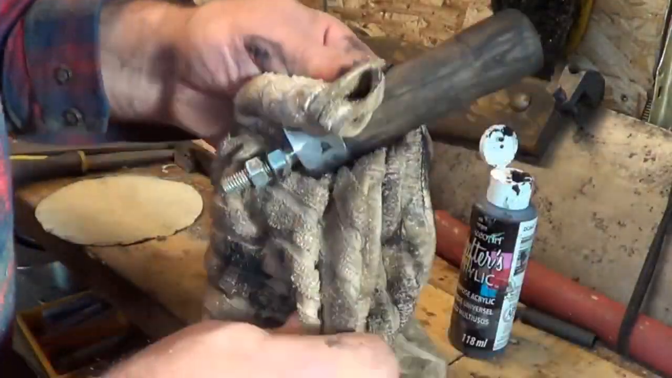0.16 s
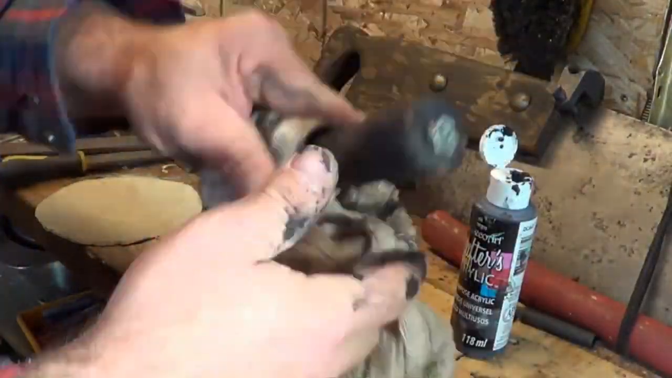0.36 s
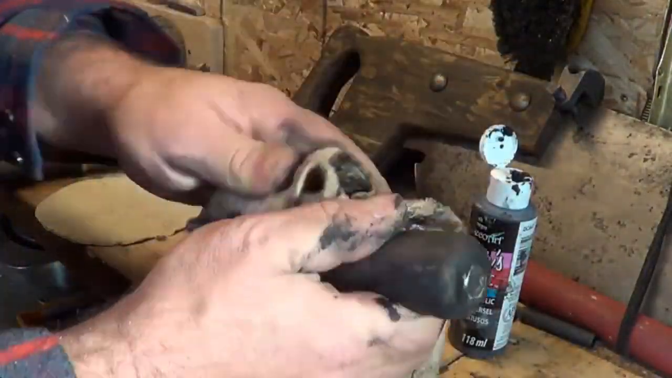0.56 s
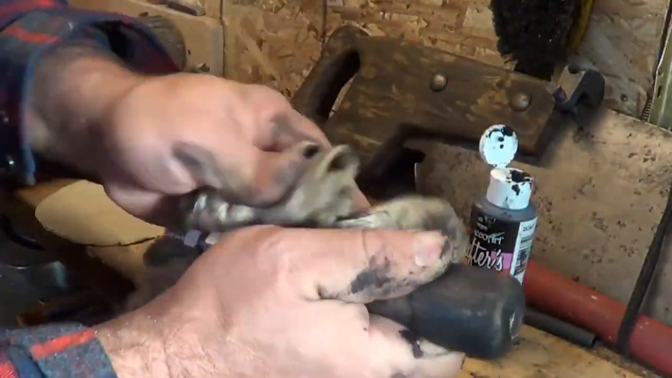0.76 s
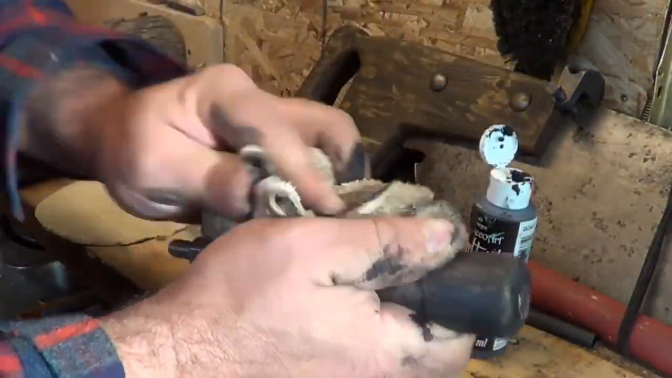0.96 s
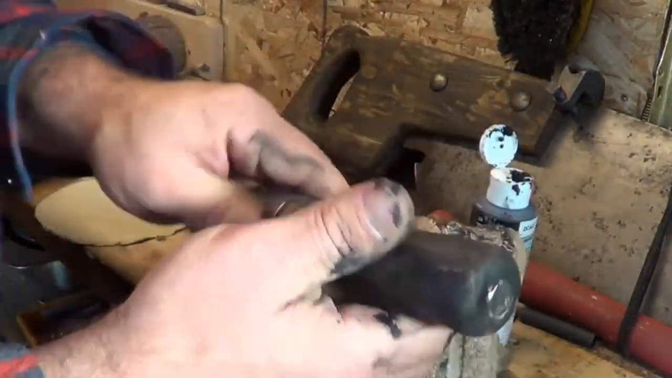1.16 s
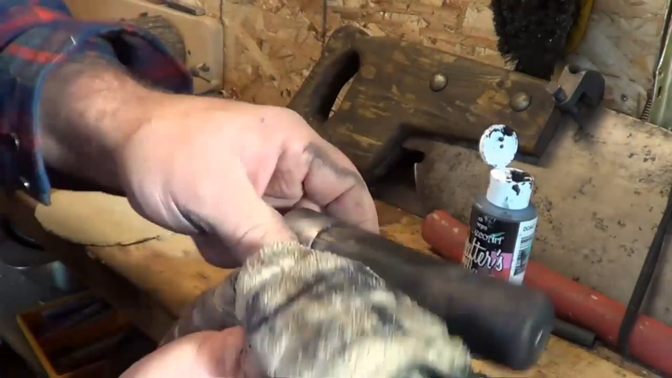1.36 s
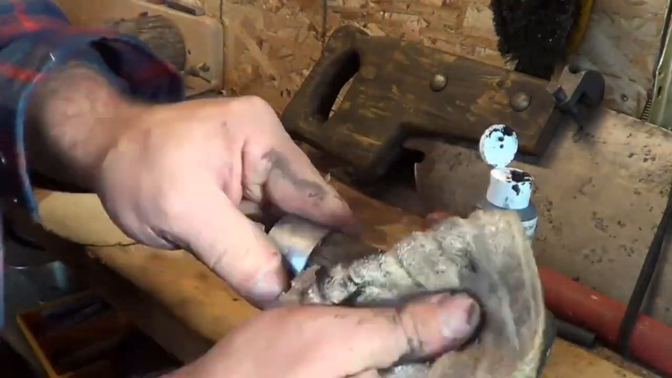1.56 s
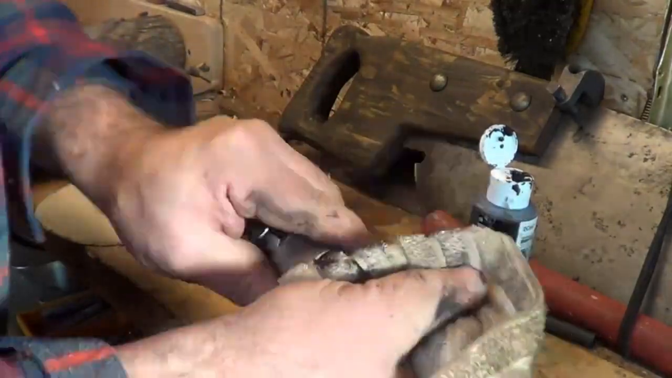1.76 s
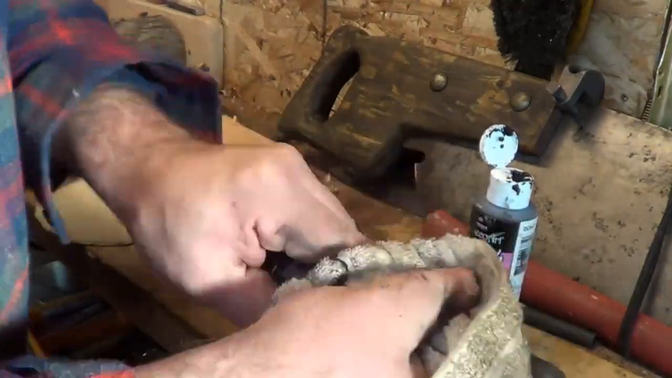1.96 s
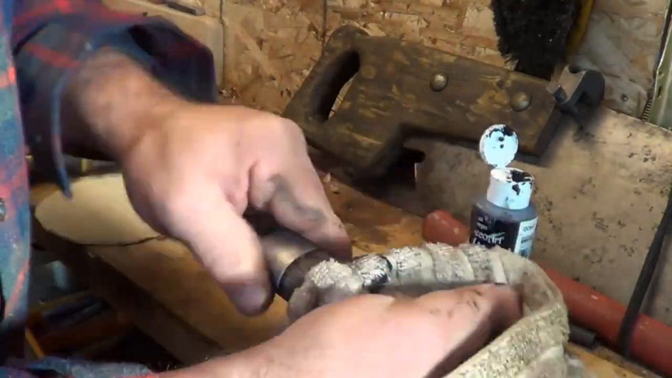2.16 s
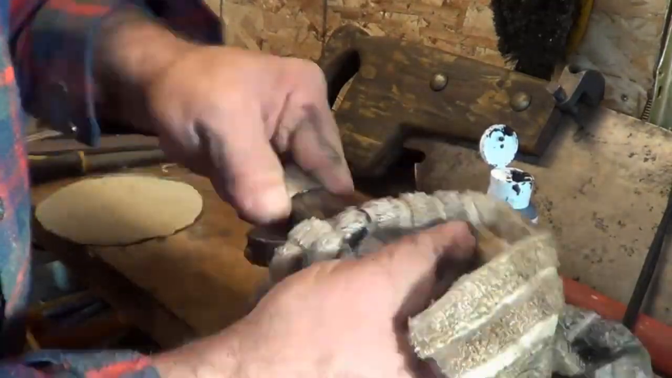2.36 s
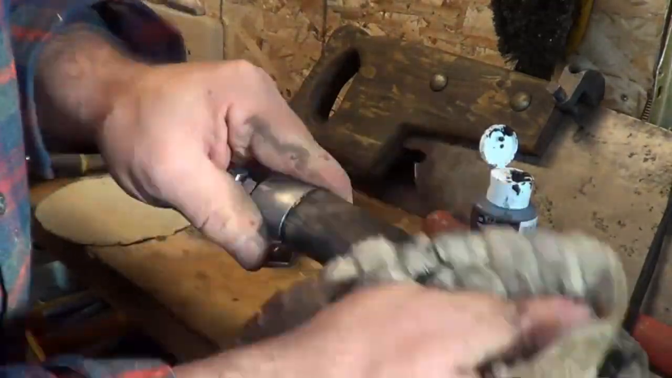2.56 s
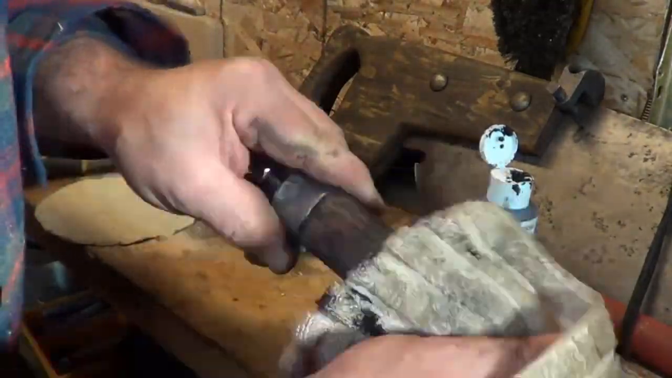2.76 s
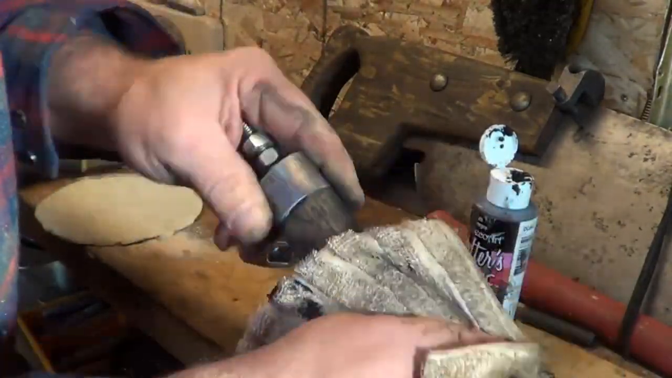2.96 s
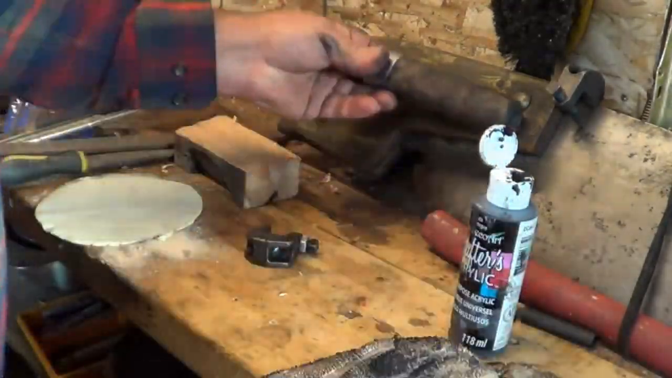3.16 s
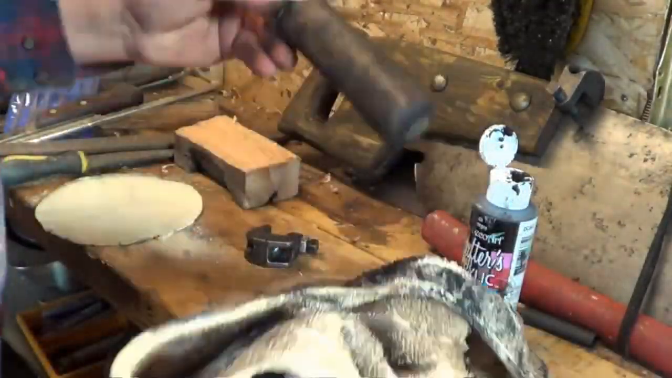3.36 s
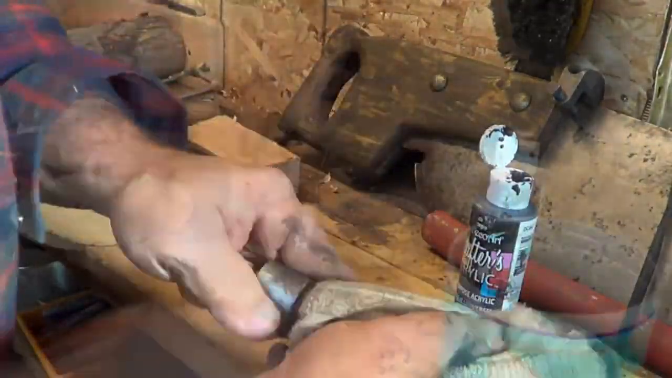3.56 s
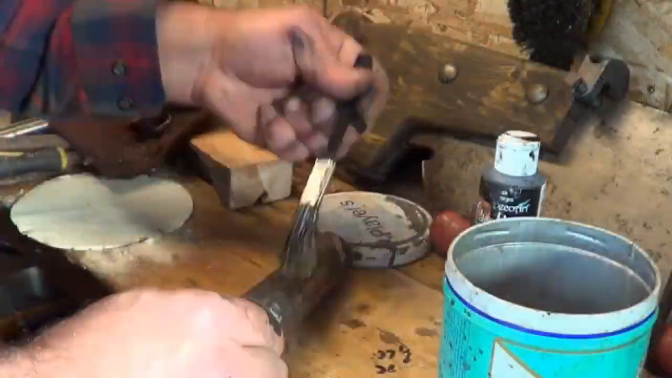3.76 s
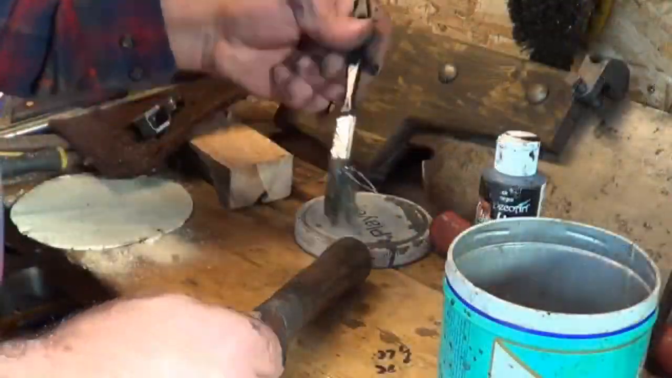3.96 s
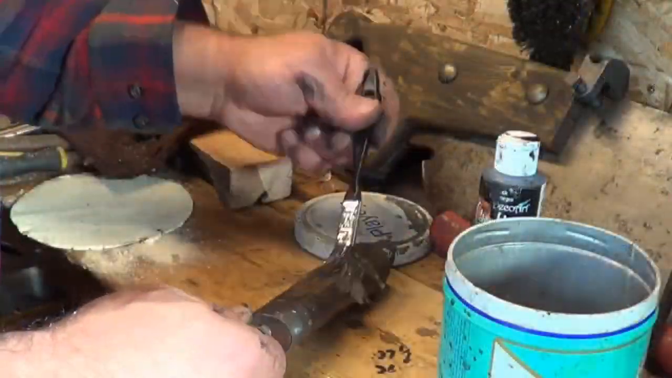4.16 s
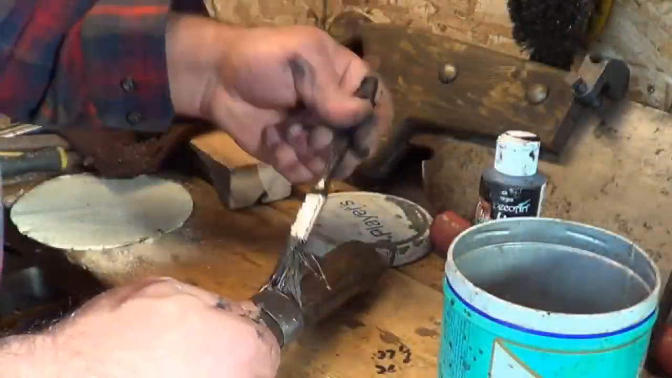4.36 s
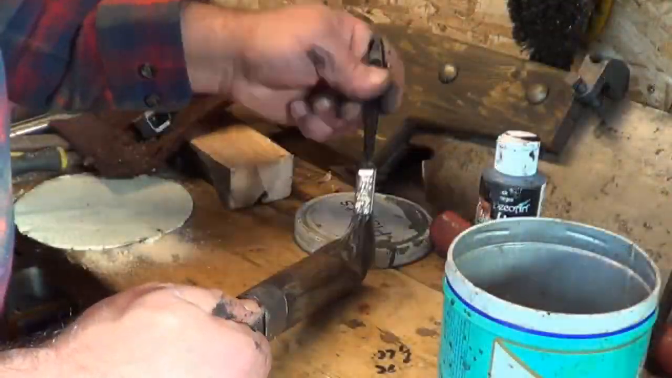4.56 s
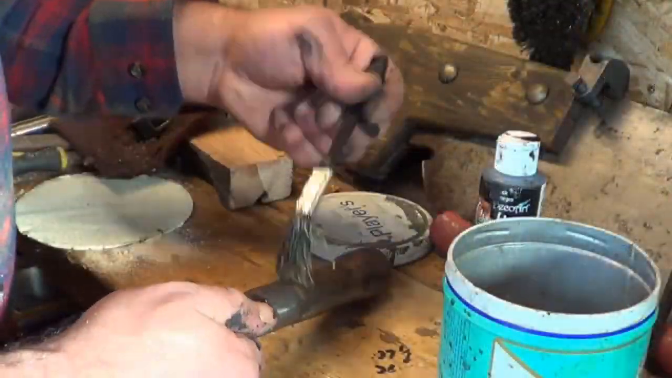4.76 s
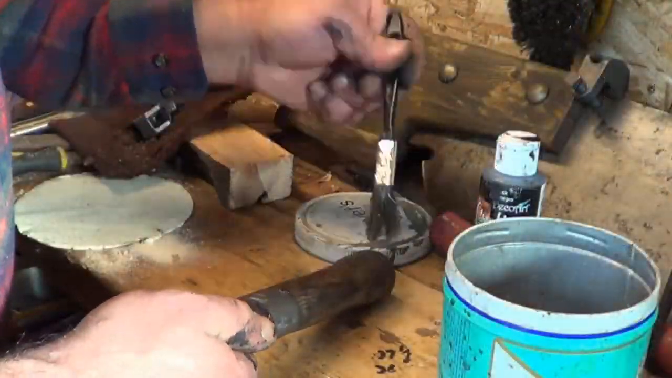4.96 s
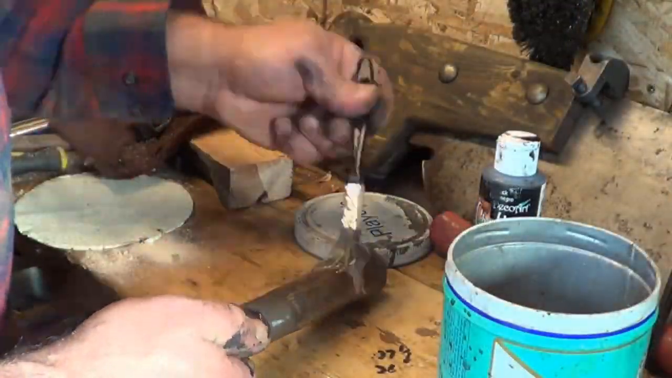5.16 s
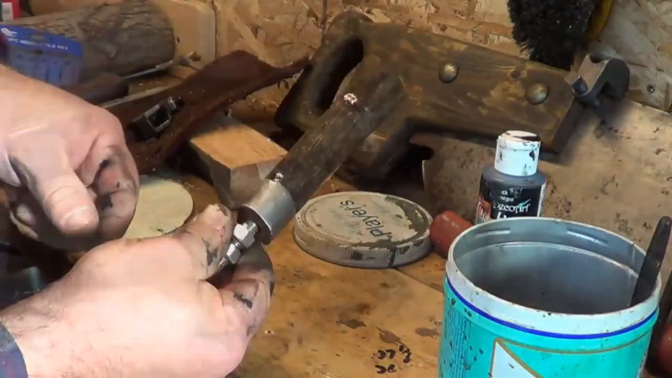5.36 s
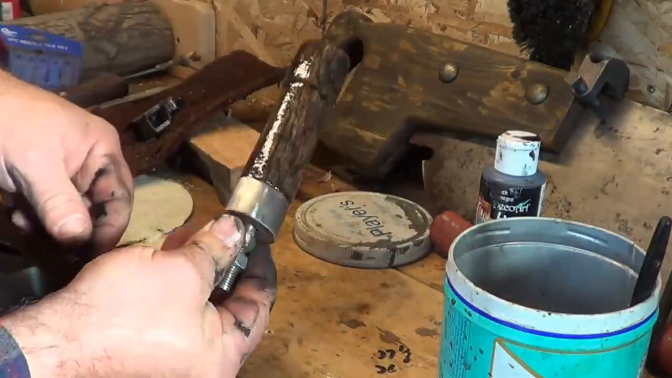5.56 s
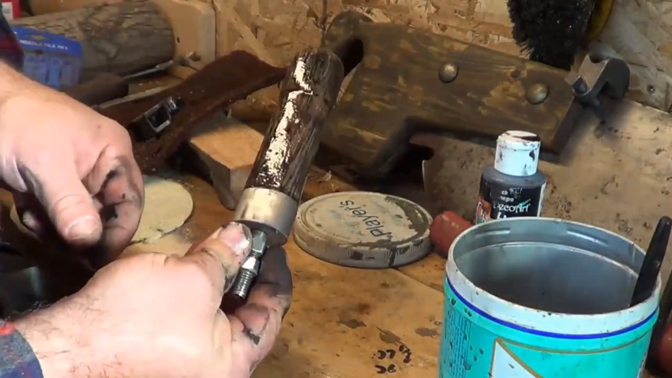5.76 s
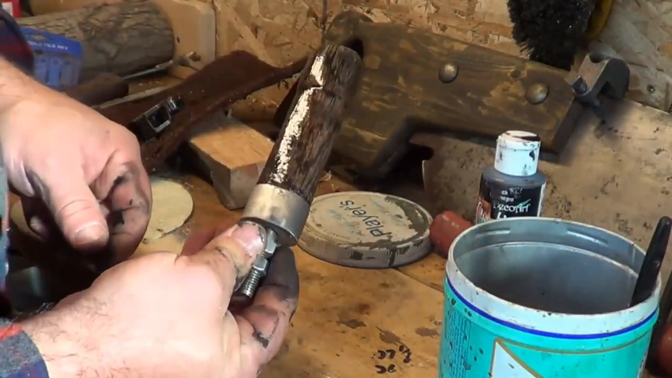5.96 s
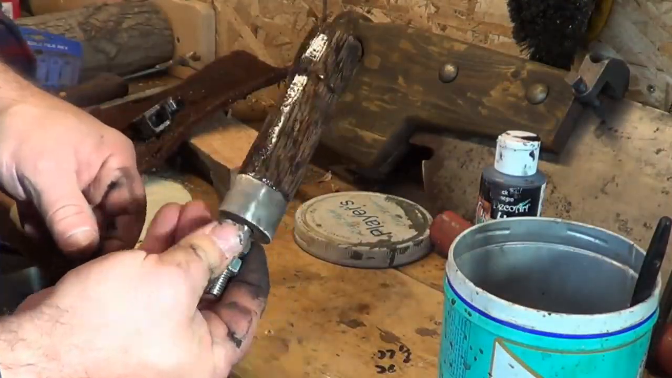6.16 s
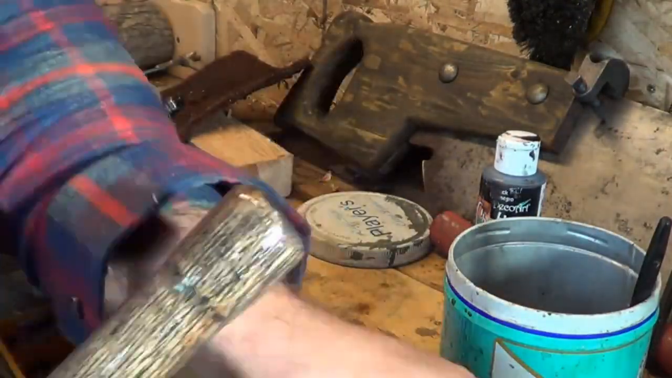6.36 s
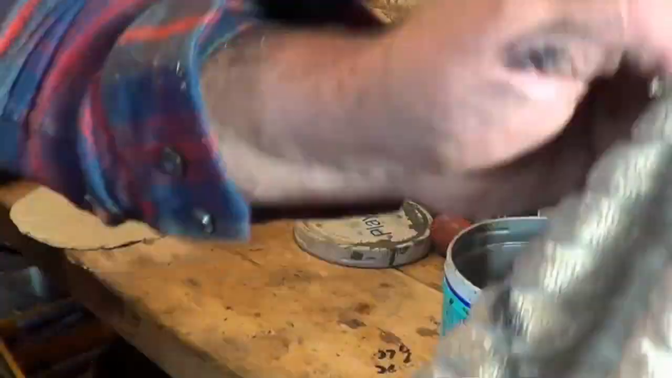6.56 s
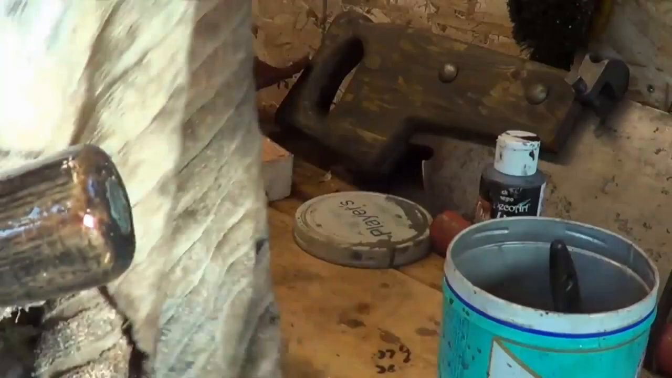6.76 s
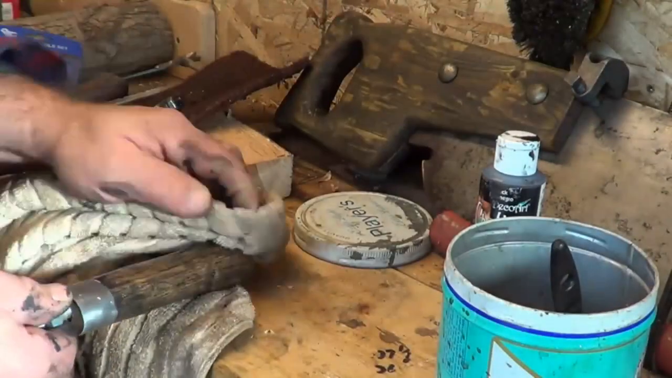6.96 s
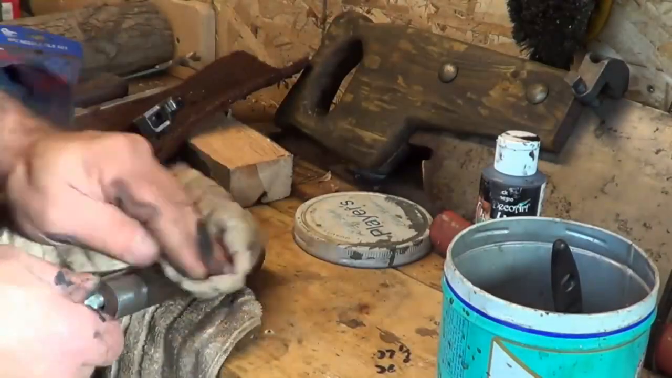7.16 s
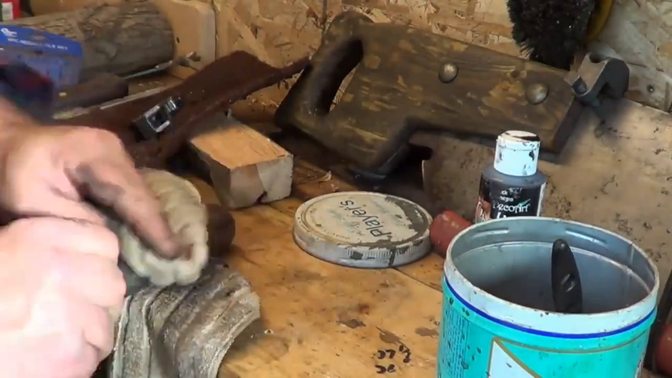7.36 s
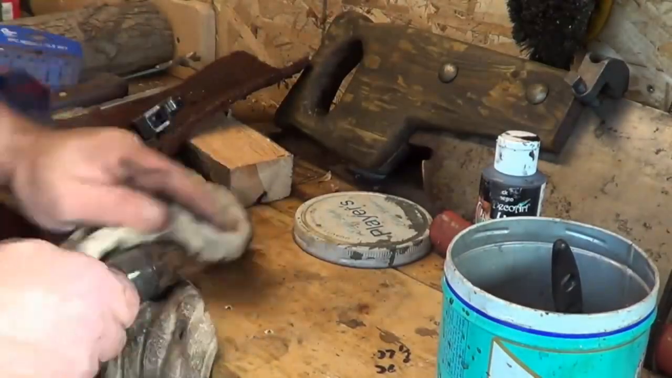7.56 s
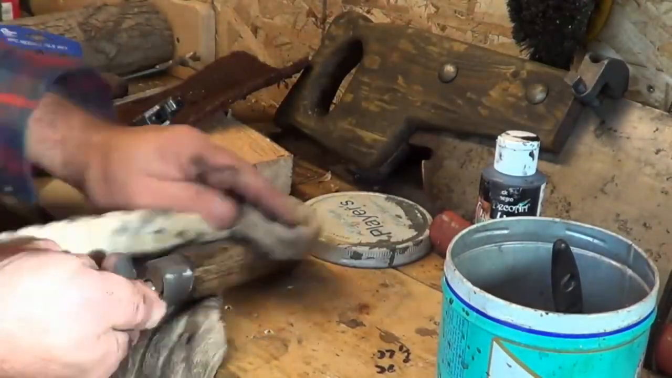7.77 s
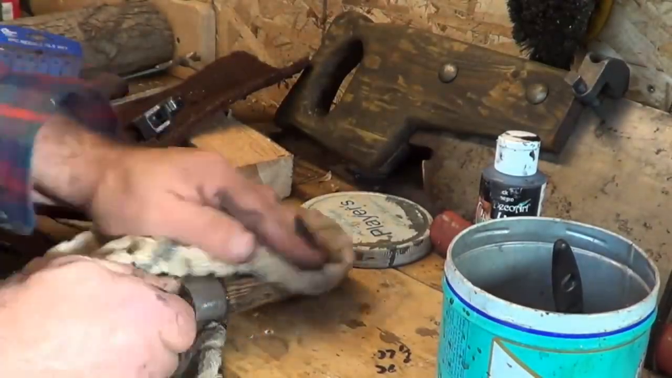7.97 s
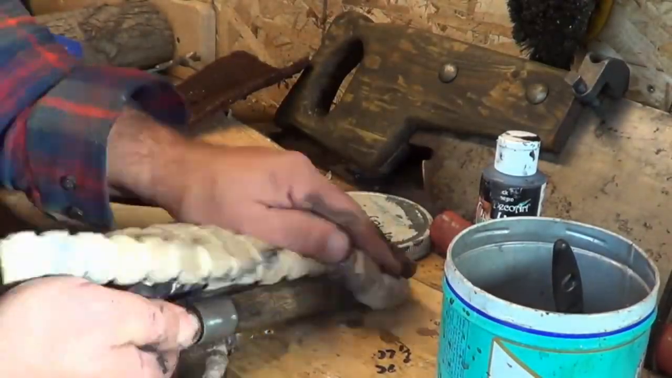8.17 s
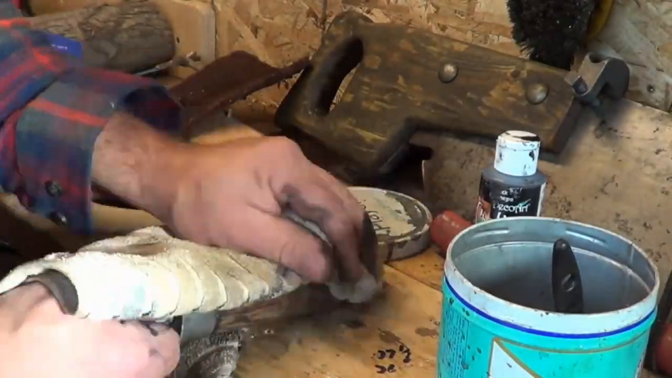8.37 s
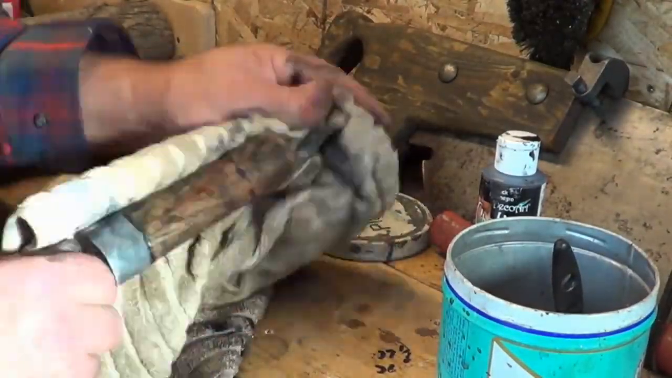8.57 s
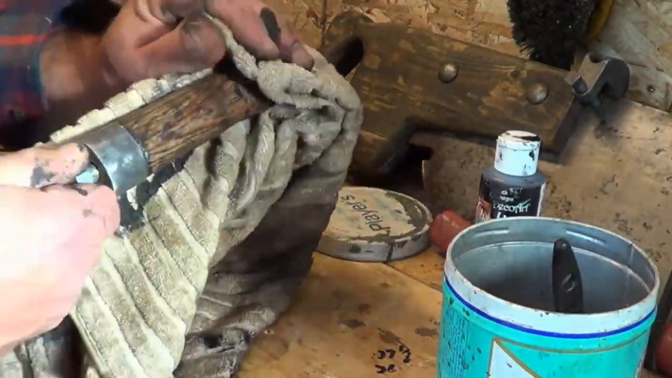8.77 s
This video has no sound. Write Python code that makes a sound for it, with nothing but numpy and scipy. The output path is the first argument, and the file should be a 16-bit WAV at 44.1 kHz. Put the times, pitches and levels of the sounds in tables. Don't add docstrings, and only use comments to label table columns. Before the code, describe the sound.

In a small hard workshop, a dry rag hisses over a wooden handle in fast, separate strokes. The handle cracks down on the bench, then a stiff brush scratches softly. After a quiet gap a metal ferrule clinks brightly, and brisk polishing follows with wooden knocks, sliding and a hard bang. Faint bird chips and whistles sit behind steady hiss, picked up by a close small camera microphone.

```python
import sys
import numpy as np
from scipy import signal
from scipy.fft import rfft, irfft
from scipy.io import wavfile
from scipy.ndimage import uniform_filter1d

SR = 44100
rng = np.random.default_rng(int(sys.argv[2]) if len(sys.argv) > 2 else 0)


def ratio_of_db(decibels):
    return 10 ** (np.asarray(decibels, float) / 20)


def unload_audio(sound):
    columns = np.transpose(np.atleast_2d(sound))
    steps = np.round(np.clip(columns, -1, 1) * 32767)
    wavfile.write(sys.argv[1], SR, steps.astype(np.int16))


N = 392490


def colour(x, points, lo_hz=1.5):
    hz, db = np.transpose(points)
    f = np.maximum(np.fft.rfftfreq(x.shape[-1], 1 / SR), lo_hz)
    gain = ratio_of_db(np.interp(np.log(f), np.log(hz), db))
    return irfft(rfft(x) * gain, x.shape[-1])


def band(x, lo_hz, hi_hz):
    sos = signal.butter(2, [lo_hz, min(hi_hz, SR / 2.1)], "band", fs=SR, output="sos")
    return signal.sosfilt(sos, x)


def unit(x):
    return x / np.sqrt(np.mean(x ** 2))


def curve(rows, column=1):
    table = np.array(rows)
    return np.interp(np.arange(N) / SR, table[:, 0], table[:, column])


def walk(rate_hz):
    hold = int(SR / rate_hz)
    steps = np.repeat(rng.standard_normal(N // hold + 1), hold)
    return uniform_filter1d(uniform_filter1d(steps, hold), hold)[:N]


def gate(start, end, fade):
    t = np.arange(N) / SR
    return np.clip(np.minimum(t - start + fade, end - t + fade) / fade, 0, 1)


def add(out, s, sound, pan_db):
    i = int(s * SR)
    piece = sound[:N - i]
    out[:, i:i + len(piece)] += piece * ratio_of_db(np.array([[pan_db], [-pan_db]]) / 2)


def spread(mid, side, alike):
    return mid + np.sqrt((1 - alike) / (1 + alike)) * side * np.array([[1], [-1]])


def level_out(x, size, fade):
    tone = rfft(x, size)
    even = irfft(tone / np.abs(tone) ** .92)[:len(x)] * fade
    return even * np.std(x) / np.std(even)


def causal(points, size):
    cepstrum = irfft(np.log(np.abs(rfft(colour(np.eye(1, size)[0], points)))), size)
    cepstrum[1:size // 2] *= 2
    cepstrum[size // 2 + 1:] = 0
    response = irfft(np.exp(rfft(cepstrum)), size)
    return response / np.abs(response).max()


def fibres(rate, scatter_db):
    snaps = (rng.random(N) < rate / SR) * ratio_of_db(scatter_db * rng.exponential(size=N))
    return unit(snaps * rng.standard_normal(N))


BUFFING = [.656, .711, .756, .81, .851, .888, .933, .978]
# middle in seconds, length in seconds, level in dB.
LONG_PULLS = [(1.676, 0.067, -52), (1.769, 0.036, -43), (1.854, 0.051, -46.5), (1.947, 0.058, -47),
              (2.055, 0.058, -46.5), (2.137, 0.046, -43.5), (2.228, 0.036, -47), (2.313, 0.045, -47),
              (2.426, 0.073, -50.5), (2.572, 0.067, -51.5), (2.766, 0.075, -56), (2.976, 0.11, -57)]
# middle in seconds, length in seconds, level in dB.
POLISHING = [(7.087, 0.021, -55), (7.11, .02, -59), (7.147, 0.028, -53), (7.2, 0.029, -54),
             (7.255, 0.016, -52), (7.291, 0.022, -52), (7.346, .03, -51), (7.385, 0.023, -54),
             (7.433, 0.028, -50), (7.473, 0.028, -50), (7.54, 0.025, -49), (7.572, .025, -51),
             (7.612, 0.026, -53), (7.665, 0.023, -55), (7.712, .03, -53), (7.758, 0.024, -52),
             (7.809, 0.027, -51), (7.854, .028, -50), (7.905, .028, -50), (8.028, .025, -49.5),
             (8.075, .035, -51), (8.132, .035, -53), (8.178, 0.048, -51), (8.265, 0.022, -53)]
# middle in seconds, length in seconds, level in dB.
RAG_SHIFTS = [(0.012, .025, -56), (.258, .057, -56), (0.404, .019, -54), (0.556, 0.2, -51.5),
              (1.016, 0.035, -45.5), (1.392, 0.071, -62), (1.518, 0.021, -49.5), (1.565, 0.062, -56),
              (1.613, 0.024, -54), (2.509, 0.05, -49), (2.632, 0.021, -48), (2.664, 0.018, -57),
              (2.83, .012, -51), (3.042, 0.048, -58), (3.446, 0.035, -60), (3.498, 0.038, -56),
              (3.545, .05, -58), (3.6, .018, -60), (3.633, .02, -56), (3.699, 0.012, -53),
              (7.94, 0.0094, -63), (8.1, 0.23, -57), (8.222, 0.03, -54), (8.298, 0.028, -58),
              (8.394, 0.094, -61), (8.5, 0.062, -52), (8.675, 0.025, -62), (8.734, 0.03, -59),
              (8.874, 0.078, -56)]


def strokes():
    moves = []
    levels, dullness = np.linspace(-55, -42, len(BUFFING)), np.linspace(3.5, -8, len(BUFFING))
    for s, db, dull_db in zip(BUFFING, levels, dullness):
        length = 0.0076 * max(1 + 0.23 * (-38 - db), .3)
        moves.append((s, length, db, dull_db))
    for rows, dull_db in ((LONG_PULLS, -3), (POLISHING, -8), (RAG_SHIFTS, -10)):
        moves += [(s, length, db, dull_db) for s, length, db in rows]
    return moves


# time in seconds, level in dB.
CLOTH_DRAG = [(0.0, -57), (0.45, -62.5), (0.84, -77), (1.25, -55), (1.4, -54), (1.71, -59), (2.53, -62),
              (3.15, -65.5), (5.01, -61.5), (5.3, -71), (7.06, -56), (7.8, -52.5), (7.93, -55.5),
              (8.0, -65.5), (8.3, -57), (8.9, -62)]
# pitch in Hz, level in dB per Hz.
CLOTH_COLOUR = [(1200, -30), (2500, -10), (4500, -2.5), (6500, -3), (8000, -1.5), (10200, -5), (13000, 0),
                (15700, -2.5)]


def rag():
    grain = colour(spread(fibres(12000, 0.53), fibres(12000, 2.7), 0.77), CLOTH_COLOUR)
    highpass = signal.butter(1, 8500, "high", fs=SR, output="sos")
    bright = signal.sosfiltfilt(highpass, grain)
    rasp = grain - bright
    scale = np.std(band(grain, 9500, 15500))
    drag = ratio_of_db(curve(CLOTH_DRAG) - 8.5 + 3.9 * walk(18)) * np.ones((2, 1))
    top, low = drag.copy(), drag * ratio_of_db(5.5)
    for s, length, db, dull_db in strokes():
        speed = np.hanning(int(1.4 * length * SR) + 2) ** 0.48
        add(top, max(s - 0.75 * length, 0), speed * ratio_of_db(db - 4.5), 0)
        add(low, max(s - 0.71 * length, 0), speed * ratio_of_db(db + dull_db + 2), 0)
    return (top * bright + low * rasp) / scale


# time in seconds, level in dB.
BRUSH_LEVEL = [(3.72, -78), (3.864, -56), (4.864, -59.5), (4.89, -83), (5.0, -56.5), (5.294, -65),
               (5.3, -79)]
# pitch in Hz, width in Hz, level in dB.
BRUSH_HISS_BANDS = [
    (2660, 610, 0.27),
    (3500, 630, -0.18),
]


def brush():
    slips = spread(fibres(8000, 1.0), fibres(8000, 1.2), 0.78)
    hiss = 0
    for hz, width, db in BRUSH_HISS_BANDS:
        hiss = hiss + ratio_of_db(db) * unit(band(slips, hz - width / 2, hz + width / 2))
    level = ratio_of_db(curve(BRUSH_LEVEL) - 4.5 + 0.37 * walk(23))
    return gate(BRUSH_LEVEL[0][0], BRUSH_LEVEL[-1][0], .05) * level * hiss


# time in seconds, level in dB.
SLIDE_LEVEL = [(6.75, -72), (7.22, -59), (7.53, -55), (7.74, -50), (7.93, -58.5), (8.15, -52.5),
               (8.33, -65), (8.46, -57), (8.9, -63)]


def scuff():
    wood = unit(band(spread(fibres(3500, 1.5), fibres(3500, 1.5), .75), 900, 3800))
    level = ratio_of_db(curve(SLIDE_LEVEL) - 3 + 3.4 * walk(25))
    return gate(SLIDE_LEVEL[0][0], SLIDE_LEVEL[-1][0], 0.089) * level * wood


def blow(hit, modes, crack, crack_ms, crack_db, click_db, ring_db, t60_share, rise_cycles):
    out, t = np.zeros((2, 2, N)), np.arange(8192) / SR
    s, peak_db, pan_db = hit
    hz, mode_db, t60 = np.transpose(modes)[:, :, None]
    rise = 1 - np.exp(-t * hz / rise_cycles)
    decay = ratio_of_db(mode_db - 60 * t / (t60 * t60_share))
    phase = rng.random(hz.shape) * rise_cycles
    ring = np.sum(rise * decay * np.sin(2 * np.pi * hz * t + phase), axis=0)
    damping = ratio_of_db(-60 * np.maximum(t - 0.016, 0) / .07)
    ring = band(ring / np.abs(ring).max(), 450, SR / 2) * damping
    contact = ratio_of_db(crack_db) * rng.standard_normal(len(t)) * np.exp(-t * 1000 / crack_ms)
    contact[0] += ratio_of_db(click_db)
    contact = level_out(contact, 2 * len(t), np.exp(-t * 1000 / (4 * crack_ms)))
    rattle = signal.fftconvolve(contact, causal(crack, size=len(t)))[:len(t)]
    add(out[0], s, ratio_of_db(peak_db - 6 + ring_db) * ring, pan_db)
    add(out[1], s, ratio_of_db(peak_db - 7) * rattle, pan_db)
    return out


# start in seconds, peak in dB, left minus right in dB.
SET_DOWN_HIT = (3.192, -12, -1.6)
# pitch in Hz, level in dB, time to fall 60 dB in seconds.
SET_DOWN_RING = [(650, -19, .09), (1400, -15, .05), (2794, 2, .08), (3730, -14, .05), (4070, -7, .055),
                 (4350, -7, .055)]
# pitch in Hz, level in dB per Hz.
SET_DOWN_COLOUR = [(170, -47), (300, -70), (640, -8.5), (1050, -17.5), (1450, -7), (2200, -15.5),
                   (2900, -0.5), (3600, -9), (4300, -6), (6000, -31), (15700, -41)]


def set_down():
    return blow(SET_DOWN_HIT, SET_DOWN_RING, SET_DOWN_COLOUR, 2.4, -12, -1.5, -3.5, 0.99, .4)


# start in seconds, peak in dB, left minus right in dB.
CLINK_HIT = (6.718, -8, -2)
JINGLE_HIT = (8.219, -36, 0)
# pitch in Hz, level in dB, time to fall 60 dB in seconds.
FERRULE_RING = [(1841, -14, .07), (2440, -6, .065), (2578, -2, .08), (3621, -3, .075), (7100, -12, .03),
                (10320, -10, .05), (12468, 2, .045), (12555, 1, .045), (12690, -2, .04), (15025, -3, .045),
                (15132, 1, .05)]
NUT_RING = [(4050, -1, .07), (5550, -5, .06), (6300, -6, .06), (7880, 1, .07), (10100, -9, .05)]
# pitch in Hz, level in dB per Hz.
METAL_COLOUR = [(120, -120), (500, -60), (800, -22), (1200, -13.5), (1850, -16), (2000, -8), (2530, -4.5),
                (4070, -12.5), (15700, -17)]


def metal():
    clink = blow(CLINK_HIT, FERRULE_RING, METAL_COLOUR, 1.5, -12.5, 6.3, -0.7, 1.0, .4)
    jingle = blow(JINGLE_HIT, NUT_RING, METAL_COLOUR, 2.0, -30, -20, 2.4, 1.1, 15.5)
    return clink + jingle


# start in seconds, peak in dB, left minus right in dB.
BANG_HIT = (8.4054, -5.5, 0.56)
# pitch in Hz, level in dB, time to fall 60 dB in seconds.
HANDLE_RING = [(1350, -9, .07), (1490, -8, .07), (1787, -4, .08), (1961, -1, .09), (2172, -5, .08),
               (2421, -6, .08), (2562, -2, .07), (2858, 0, .075), (2980, 0, .075), (3637, -2, .07),
               (3925, 1, .07), (4140, -4, .06), (4800, -6, .04), (5800, -14, .045)]
BENCH_RING = [(640, -4, 0.062), (790, -4, .07), (955, -2, 0.056), (1076, 0, .07), (1223, 1.5, 0.06),
              (3120, 6, .07), (3440, 3, .06), (4360, -1.5, .05)]
# pitch in Hz, level in dB per Hz.
BANG_COLOUR = [(15, -70), (45, -36), (300, -40), (420, -48), (620, -22.5), (1900, -7), (3300, -4),
               (6450, -18), (15700, -62)]


def bang():
    handle = blow(BANG_HIT, HANDLE_RING, BANG_COLOUR, 5.4, -10, -1.5, 1.2, 0.89, 2.93)
    bench = blow(BANG_HIT, BENCH_RING, BANG_COLOUR, 3.0, -30, -30, -9.5, 0.85, 4.2)
    return handle + bench


def taps(rows, width, t60, body_db):
    out, t = np.zeros((2, N)), np.arange(2600) / SR
    for (s, db, hz, ms), noise in zip(rows, rng.standard_normal((len(rows), len(t)))):
        push = noise * np.exp(-t * 1000 / ms)
        knock = push + .25 * np.sin(2 * np.pi * hz * t) * ratio_of_db(-60 * t / t60)
        ring = band(knock, hz / width, hz * width)
        ring = band(ring, hz / width ** 2, hz * width ** 1.18)
        ring = ring + ratio_of_db(body_db) * band(push, hz / 2.42, hz / width)
        add(out, s, ring / np.abs(ring).max() * ratio_of_db(db), .5)
    return out


# start in seconds, peak in dB, pitch in Hz.
WOOD_TAPS = [(0.397, -59, 3230), (1.44, -50, 1810), (2.839, -57, 1250), (3.422, -56.5, 900),
             (6.602, -53, 1210), (6.746, -53.5, 617), (6.772, -49, 1040), (6.791, -40.5, 1700),
             (7.33, -28.5, 1520), (7.391, -41, 1940), (7.475, -44.5, 1570), (7.548, -51, 2730),
             (7.577, -42, 1570), (7.617, -58, 2530), (7.667, -46, 1530), (7.761, -43, 1500),
             (7.909, -39.5, 1590), (8.044, -54, 1890), (8.145, -45, 1880), (8.222, -40, 3500),
             (8.266, -38, 2250), (8.301, -28, 1790), (8.477, -40, 1540), (8.509, -46, 3100)]
# start in seconds, peak in dB, pitch in Hz.
DRY_TICKS = [(0.794, -38, 11900), (1.0133, -35, 7660), (5.762, -50, 14500), (6.018, -45, 13500),
             (1.753, -37, 8000), (3.601, -39, 14400), (3.688, -44, 13300), (4.671, -41.5, 12300),
             (4.9366, -37, 10900), (5.018, -49, 8860), (6.529, -32.5, 8300), (6.792, -36.5, 6950),
             (7.248, -34, 11100), (7.9349, -37, 14800), (8.1494, -43, 13500)]
# start in seconds, peak in dB, pitch in Hz, contact in ms.
NUT_SHIVERS = [
    (6.702, -46, 14500, 2.5),
    (6.711, -43, 13500, 2.5),
    (6.604, -47, 5700, 8.0),
    (6.606, -48, 4200, 8.0),
    (8.4056, -34, 13600, 1.5),
    (6.529, -42, 3700, 2.5),
]


def small_contacts():
    wood = [(s, db, hz, min(1000 * 7.7 / hz, 7.6)) for s, db, hz in WOOD_TAPS]
    dry_ticks = [(s, db, hz, 0.48) for s, db, hz in DRY_TICKS]
    return taps(wood, 1.73, 0.031, -6) + taps(dry_ticks, 1.7, 0.011, -12) + taps(NUT_SHIVERS, 1.12, .012, -25)


# middle in seconds, length in seconds, level in dB, pitch in Hz.
HANDLE_SCRAPES = [(2.841, 0.018, -58, 1190), (3.226, .04, -70, 170), (3.428, 0.027, -60, 890),
                  (4.502, 0.049, -68, 605), (5.658, 0.062, -70.5, 330), (5.999, 0.071, -70, 427),
                  (6.532, 0.011, -54, 2000), (6.607, 0.046, -63, 3500), (6.745, .016, -60, 480),
                  (6.764, 0.015, -63, 400), (6.778, 0.021, -51, 1040), (6.798, 0.024, -57.5, 520),
                  (6.998, 0.22, -75.5, 350), (7.398, 0.021, -52, 2300), (7.581, 0.024, -43.5, 1700),
                  (7.62, 0.04, -53, 890), (7.686, 0.039, -50, 2400), (7.723, 0.042, -54, 2500),
                  (7.764, .025, -48, 1190), (7.783, 0.017, -44.5, 1500), (7.912, 0.037, -50, 2200),
                  (8.042, 0.021, -49, 1800), (8.151, 0.026, -46, 1790), (8.205, 0.073, -66, 350),
                  (8.226, 0.026, -45.5, 3500), (8.226, .022, -46, 1450), (8.248, .03, -50, 3300),
                  (8.269, 0.019, -45, 2520)]
# middle in seconds, length in seconds, level in dB, pitch in Hz.
THREAD_RASPS = [(8.045, .02, -52, 15000), (8.7, .03, -55, 11700), (8.15, .08, -56, 14000),
                (8.25, .07, -57, 13600), (8.485, .04, -54, 13500), (8.49, .02, -53, 11800),
                (7.905, .02, -58, 14500), (8.2, .015, -55, 10400)]


def scrapes():
    out = np.zeros((2, N))
    for rows, width in ((HANDLE_SCRAPES, 1.25), (THREAD_RASPS, 1.05)):
        for (s, length, db, hz), chance in zip(rows, rng.standard_normal((len(rows), 2, 12000))):
            uneven = chance[0] * ratio_of_db(4.6 * chance[1])
            slips = unit(band(uneven, hz / width, hz * width))
            swell = np.hanning(min(int(1.4 * length * SR), len(slips)))
            add(out, s - 0.81 * length, ratio_of_db(db) * swell * slips[-len(swell):], .6)
    return out


def room(x):
    t60_s = 0.072
    t = np.arange(6000) / SR
    fade = ratio_of_db(-60 * np.maximum(t - .003, 0) / t60_s) * (t > .0007)
    noise = rng.standard_normal((2, len(t))) * fade
    mid, side = band(noise, 450, SR / 2) / np.sqrt(np.sum(fade ** 2))
    mid[int(.0007 * SR)] += ratio_of_db(-3)
    mid[0] += 1
    mid = level_out(mid, 4 * len(t), ratio_of_db(-60 * np.maximum(t - .022, 0) / t60_s))
    both = spread(mid, side, .55)
    lag = int(.0074 * SR)
    both[:, lag:] += ratio_of_db(-9) * both[:, :-lag]
    return signal.oaconvolve(x, both, axes=1)[:, :N]


# start in seconds, level in dB, first and last pitch in Hz, length in seconds.
BIRD_CHIPS = [
    (4.221, -57, 15500, 10040, 0.04),
    (5.453, -51.5, 15700, 11900, 0.023),
    (6.01, -51, 15300, 10900, 0.035),
    (6.442, -55, 14600, 9600, 0.027),
    (7.042, -48, 15500, 9700, 0.018),
    (7.505, -44.5, 15300, 10800, 0.025),
    (8.036, -53, 15400, 10800, 0.044),
]


def chips():
    out, t = np.zeros((2, N)), np.arange(200) / SR
    for (s, db, from_hz, to_hz, length), chance in zip(BIRD_CHIPS, rng.standard_normal((len(BIRD_CHIPS), 30, 2))):
        for step, (off, size) in zip(np.linspace(0, 1, len(chance)), chance):
            hz = from_hz + (to_hz - from_hz) * step + 750 * off
            note = np.hanning(len(t)) * np.sin(2 * np.pi * hz * t + 9 * off)
            add(out, s + length * step, ratio_of_db(db - 3 + 3.9 * size - 4.2 * step) * note, 1.5)
    return out


# time in seconds, pitch in Hz, level in dB.
HIGH_WHISTLES = [
    [(6.88, 4900, -70), (6.912, 4960, -63), (6.93, 4920, -72)],
    [(6.95, 5220, -71), (6.992, 4867, -54), (7.0, 4870, -65)],
    [(7.043, 4961, -58), (7.066, 5200, -53), (7.082, 5050, -52), (7.097, 4680, -54)],
    [(7.103, 4780, -41), (7.13, 4880, -61), (7.155, 5070, -49), (7.183, 4860, -55), (7.195, 4650, -56)],
]
# time in seconds, pitch in Hz, level in dB.
LOWER_WHISTLE = [(6.985, 3700, -67), (6.999, 3800, -51), (7.018, 3478, -64.5)]


def whistles():
    out = np.zeros((2, N))
    for rows in list(HIGH_WHISTLES) + [LOWER_WHISTLE]:
        a, b = int(rows[0][0] * SR), int(rows[-1][0] * SR)
        level = ratio_of_db(curve(rows, column=2)[a:b] + 1.5)
        tone = level * np.sin(2 * np.pi * np.cumsum(curve(rows)[a:b]) / SR)
        add(out, rows[0][0], tone * signal.windows.tukey(b - a, .3), 0)
    return out


# start in seconds, end in seconds, pitch in Hz, drift in Hz, level in dB.
MOTOR_TONES = [
    (0, .72, 195, 6, -89),
    (3.72, 5.28, 195, 4, -85),
    (0, 2.25, 865, 3, -78),
    (2.3, 3.1, 865, 5, -82),
    (3.75, 5.3, 335, 4, -90),
    (0, 8.9, 8846, 4, -80),
]


def tones():
    out = 0
    for start, end, hz, drift, db in MOTOR_TONES:
        level = gate(start, end, 0.083) * ratio_of_db(db + 4.5 + 3.5 * walk(8.1))
        out = out + level * np.sin(2 * np.pi * np.cumsum(hz + drift * walk(4.6)) / SR)
    return out


# pitch in Hz, level in dB per Hz.
AIR_COLOUR = [(25, -34), (60, -30), (120, -25), (250, -18), (500, -11), (800, -5), (1300, -2.5),
              (2000, -1.5), (3200, -.6), (5000, -6), (6500, -10), (10000, -14), (13000, -14), (15700, -15)]
# time in seconds, level in dB.
AIR_SLOW_LEVEL = [(0.0, -64), (2.08, -63.5), (3.49, -66.5), (5.43, -65.5), (5.65, -63), (8.33, -61),
                  (8.48, -61), (8.9, -64)]
# pitch in Hz, likeness from 0 to 1.
AIR_LIKENESS = [(60, 0.26), (150, 0.56), (600, 0.77), (1500, 0.63), (3000, 0.57), (7000, 0.052),
                (15000, 0.16)]
# start in seconds, end in seconds, pitch in Hz, width in Hz, level in dB.
FAN_AND_LAMP = [(3.22, 3.42, 802, 16, -74), (0, 8.9, 8750, 450, -72), (3.6, 5.3, 5394, 50, -73),
                (3.7, 6.5, 12032, 200, -78), (5.5, 8.9, 335, 60, -84), (5.5, 8.9, 1250, 300, -68),
                (0, 8.9, 2550, 250, -71), (3.2, 5.2, 150, 90, -93)]


def air():
    out, slow_db = 0, curve(AIR_SLOW_LEVEL)
    noise = colour(rng.standard_normal((2, N)), AIR_COLOUR)
    scale = np.std(band(noise, 700, 1800))
    octave = np.log2(np.fft.rfftfreq(N, 1 / SR) + 1)
    spectrum = rfft(noise)
    alike_hz, alike_share = np.transpose(AIR_LIKENESS)
    for centre in np.arange(4, 15):
        mid, side = irfft(spectrum * np.clip(1 - np.abs(octave - centre), 0, 1), N)
        alike = np.interp(centre, np.log2(alike_hz), alike_share)
        follow = 1 / (1 + (2 ** centre / 7500) ** 2)
        db = follow * slow_db + (1 - follow) * np.mean(slow_db) + 0.099 * walk(29)
        out = out + ratio_of_db(db) / scale * spread(mid, side, alike) * ratio_of_db(np.array([[.5], [-.5]]))
    for start, end, hz, width, db in FAN_AND_LAMP:
        hum = unit(band(rng.standard_normal(N), hz - width / 2, hz + width / 2))
        out = out + gate(start, end, 0.054) * ratio_of_db(db) * hum
    return out


# pitch in Hz, width in Hz, gain in dB.
HOLLOWS = [(1255, 41, 2.5), (1700, 52, 3), (1890, 45, 3), (2400, 50, 3), (2537, 23, -1.5), (2768, 37, 6.5),
           (3320, 31, 4.5), (3650, 66, 2.5), (3960, 62, 3.5), (4130, 40, 2)]


def cavities(x):
    f = np.fft.rfftfreq(N, 1 / SR)
    lift_db = sum(db / (1 + (2 * (f - hz) / width) ** 2) for hz, width, db in HOLLOWS)
    return irfft(rfft(x) * ratio_of_db(lift_db), N)


def scene():
    ring, crack = set_down() + metal() + bang()
    sharp = small_contacts() + crack + 0.34 * ring + chips()
    steady = rag() + scuff() + brush() + air()
    return room(sharp) + ring + cavities(steady) + whistles() + tones() + scrapes()


def roll_off(x):
    return signal.sosfilt(signal.butter(12, 16850, fs=SR, output="sos"), x)


def record(dry):
    rounded = .8 * np.tanh(dry / .8)
    top_cut = signal.ellip(8, .3, 45, 15850, fs=SR, output="sos")
    mix = signal.sosfilt(top_cut, rounded)
    return roll_off(mix)


dry = scene()
out = record(dry)
unload_audio(out)
```